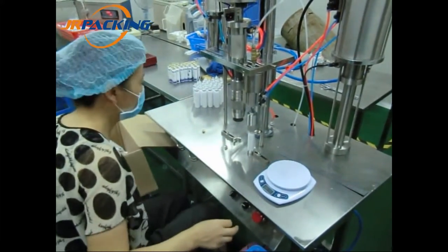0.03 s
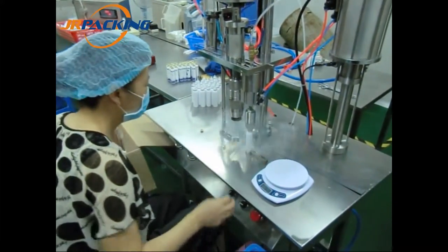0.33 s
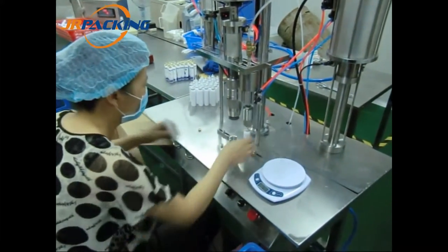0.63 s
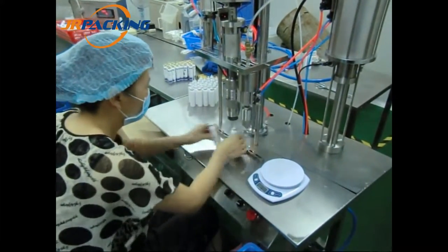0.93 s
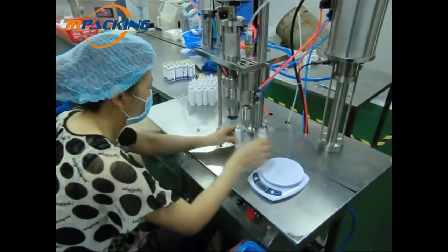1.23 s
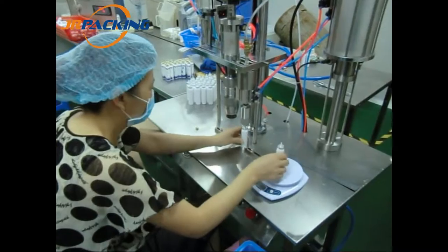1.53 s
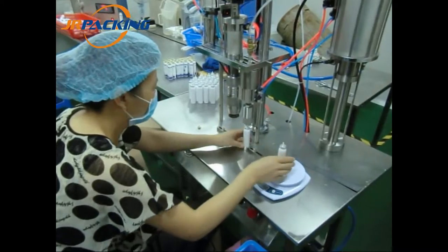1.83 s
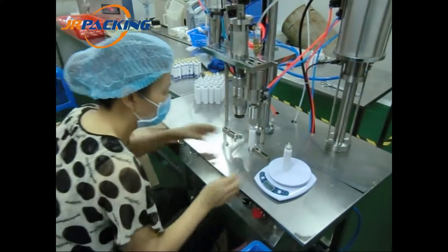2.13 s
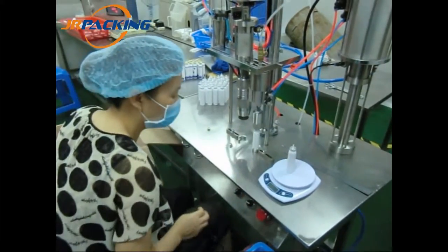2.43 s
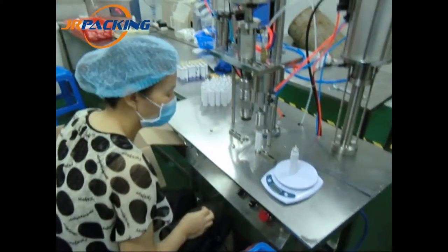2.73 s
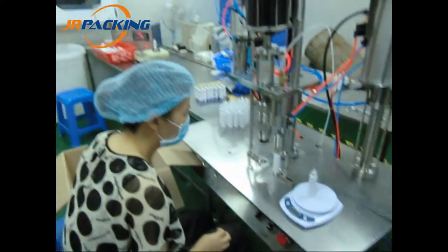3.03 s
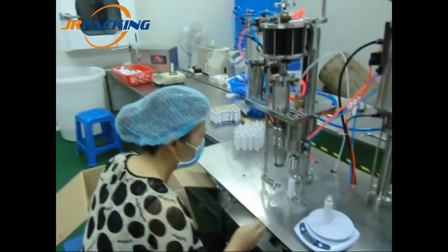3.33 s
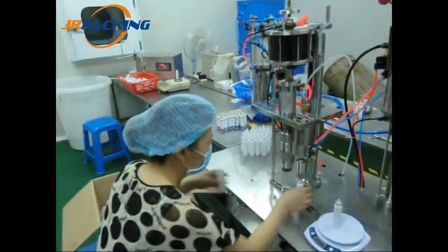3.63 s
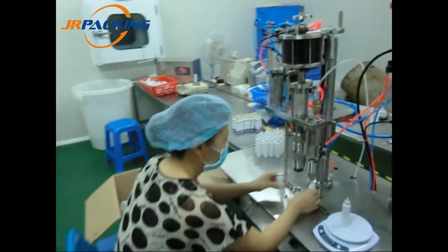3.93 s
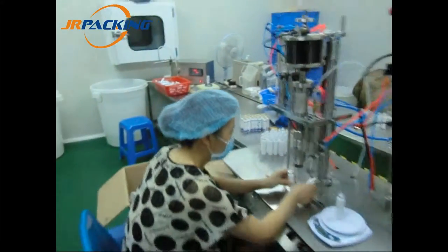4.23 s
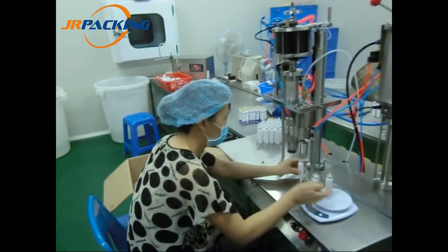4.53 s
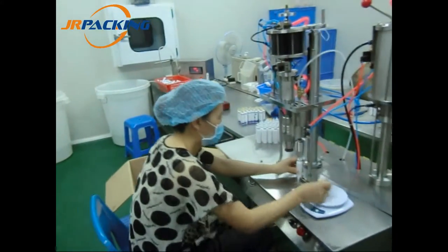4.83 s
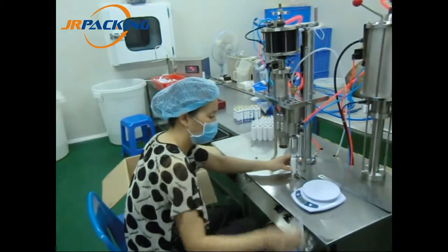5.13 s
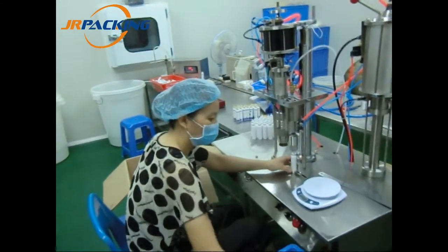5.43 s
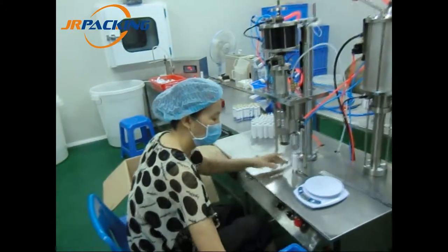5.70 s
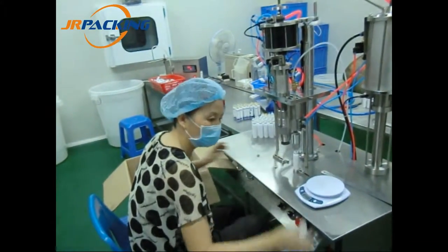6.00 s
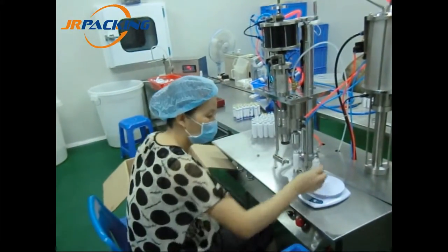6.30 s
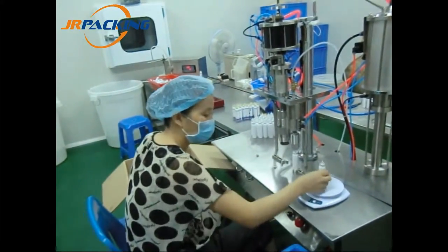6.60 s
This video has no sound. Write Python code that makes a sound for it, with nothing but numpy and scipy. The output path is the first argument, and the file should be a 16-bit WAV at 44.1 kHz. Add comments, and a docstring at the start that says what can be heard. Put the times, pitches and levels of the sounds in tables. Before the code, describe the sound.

Compressed air bursts from a filling machine in two cycles, each with pistons clunking and a steel bench droning low. After each one, small plastic bottles click on a holder and land on a scale, more softly the second time. Near the end, plastic parts knock and rustle in a cardboard box. The sounds are close in a slightly echoing workroom, where steady ventilation creeps back up after the blasts duck the recording level.

```python
"""A pneumatic bottle filler cycles twice in a hard-walled workroom, the first cycle already under way.
Its valves hiss in turn (working stroke, pilot puff, return blast) as pistons clunk on their stops,
a seal groans and the steel bench drones. After each cycle small plastic bottles click on the holder
and land on a scale; then a hand rummages in a carton of plastic parts. Ventilation is the steady bed.
The camera's gain control ducks under the loud blasts and creeps back up."""
import sys
import numpy as np
from scipy import signal
from scipy.fft import rfft, irfft, next_fast_len
from scipy.io import wavfile
from scipy.ndimage import map_coordinates

SR = 44100
rng = np.random.default_rng(int(sys.argv[2]) if len(sys.argv) > 2 else 0)


def materialize(psi):
    """Save the field psi as 16-bit PCM at rate SR to the path in sys.argv[1].

    A 1-D psi becomes a single channel; in a 2-D psi each row is a channel.
    """
    bounded = np.clip(np.atleast_2d(psi).T, -1, 1)
    quanta = np.round(bounded * 32767).astype(np.int16)
    wavfile.write(sys.argv[1], SR, quanta)


N = 293706
TIME = np.arange(N) / SR  # scene clock, s
AGE = np.arange(SR) / SR  # clock of a one-second hit, s

# machine cycle starts: t/s
CYCLE_STARTS = [-0.5274, 2.3619]
# hiss colours of the three valves: f/Hz, level/dB
STROKE_COLOUR = [(100, -20), (250, -13.5), (550, -14), (1050, -15.5), (1300, -9), (2000, -9), (2500, -0.5),
                 (3100, -1.5), (3700, -3.5), (4400, -3.5), (6500, -6), (8300, -17.5), (10300, -11)]
PUFF_COLOUR = [(100, -17), (250, -11), (480, -15), (1000, -11), (1300, -5.5), (1600, -3), (2050, -10),
               (2600, -4), (3800, -5), (5500, 1.5), (7000, 0), (10500, -8)]
RETURN_COLOUR = [(100, -25), (290, -13.5), (480, -12.5), (700, -20.5), (1080, -35), (1350, -11),
                 (2100, -9.5), (2700, -3.5), (3250, 3), (4200, -4), (4800, -2), (6200, -8), (10500, -18.5)]
# bright fizz and midrange roar of air at high pressure: f/Hz, level/dB
FIZZ_COLOUR = [(200, -37), (1000, -16), (2800, -22), (4500, -8), (6000, -9.5), (7200, -3.5), (8200, -4),
               (9400, -1.5), (10500, -6)]
ROAR_COLOUR = [(60, -21), (160, -11), (650, -6.5), (950, 4.5), (1250, 0), (1800, 6.5), (3000, -18.5)]
# exhaust silencer resonances: f/Hz, width/Hz, level/dB
SILENCER_PEAKS = [(3270, 1120, 3.5), (4390, 220, 6), (4500, 140, 3)]
# narrow tones the hiss excites in the steelwork: f/Hz, level/dB
STEEL_TONES = [(2326, -39), (2611, -37), (2783, -48), (2955, -36), (3128, -36.5), (3332, -51), (3456, -39),
               (3596, -47), (3795, -41), (4436, -45), (4807, -46)]
# hollow pop of the pilot port: f/Hz, level/dB, t60/s
PORT_MODES = [(1257, -8.5, .2), (1394, -11.5, 0.11)]

# piston hits: t/s into the cycle, thump level/dB, clank level/dB
PISTON_HITS = [(0.0, -6.5, -16), (0.121, -12.5, -9.5), (0.185, -24.5, -13), (0.497, -14.5, -20),
               (0.536, -30, -15), (0.725, -4.5, -2.5), (0.87, -19, -24)]
# ring of the steel bench, ring of the cylinder, first damped jolt of a hit: f/Hz, level/dB, t60/s
BENCH_MODES = [(82, -16, 0.047), (141.5, 4.5, 0.13), (187, 4, 0.11), (200.5, 1, 0.2), (249, -4.5, 0.1),
               (310, -28, 0.054)]
CYLINDER_MODES = [(595, -11.5, 0.23), (790, -4.5, 0.066), (955, 4.5, 0.026), (1160, -13, 0.034),
                  (1490, -6, 0.027), (1740, -4, 0.15), (2850, -10, 0.044), (5030, 5, 0.035)]
JOLT_MODES = [(221, -0.37, 0.034), (897, -1.6, 0.012)]
# low shudder of the bench: f/Hz, level/dB
SHUDDER_COLOUR = [(25, -23), (75, -10), (150, -1.5), (260, -4), (450, -13.5), (1200, -12.5),
                  (3000, -50.5)]
# piston seal groans: t/s into the cycle, level/dB, half-length/s
SEAL_GROANS = [(0.5, -27.5, 0.03), (0.896, -30, 0.046), (1.004, -30.5, 0.031)]
# resonances of the rubbing seal and the droning bench: f/Hz, width/Hz, level/dB
SEAL_PEAKS = [(484, 52, 19), (224, 160, -2)]
DRONE_PEAKS = [(141, 11, 2), (170, 14, -6), (116, 12, -10)]

# bottles clicking on the holder: t/s, level/dB, snap trim/dB
BOTTLE_CLICKS = [(1.318, -20.5, 1), (1.536, -33.5, -8), (4.3842, -25.5, -5), (4.442, -34.5, -16),
                 (4.505, -35.5, -1.5), (4.637, -36, -16), (4.662, -34.5, -2)]
# bottles landing on the scale: t/s, level/dB
BOTTLE_SETDOWNS = [(1.6066, -10), (4.7611, -32), (4.772, -35)]
# body of a click, its bright snap, clack of the scale pan: f/Hz, level/dB
CLICK_COLOUR = [(200, -31), (380, -7.5), (680, 2), (850, 1), (1050, 1.5), (1200, -4), (1400, 4),
                (1950, -10), (3000, -10), (5000, -12), (10500, -25)]
SNAP_COLOUR = [(400, -16), (1300, -4), (2000, -5), (2400, 2), (3300, 0.5), (4500, -9), (10000, -10)]
PAN_COLOUR = [(250, -42), (430, -2), (560, 3.5), (690, -4.5), (850, -3), (1020, -14), (1250, 1), (1550, -3),
              (1900, 0), (2600, -3), (3100, -16), (4000, -22), (4800, -9.5), (5700, -31), (8200, -20),
              (10000, -33)]
# ring of the scale pan: f/Hz, level/dB, t60/s
PAN_MODES = [(483, -18, .08), (857, -2.5, 0.093), (1215, 6.5, 0.083), (1820, -13, .04), (2530, -11, .04),
             (4530, 3, 0.026), (8000, -16, .02)]

# parts knocking in the carton: t/s, level/dB, carton trim/dB, low ring trim/dB, high ring trim/dB
PART_KNOCKS = [(5.693, -26.5, -5, -19, -20), (5.744, -29, -12, -11, -13), (5.79, -32, -1, -17, -10),
               (5.884, -18, -8.5, -27, -18), (5.959, -19, -12, -8, -17), (5.967, -14.5, -15.5, -10, -16),
               (5.989, -19.5, -2, -3, -16), (6.063, -22.5, -25, -2, -10), (6.115, -17.5, -25, -2, -12),
               (6.196, -13, -17, -11.5, -7), (6.354, -21.5, -6.5, -21, -22), (6.375, -19.5, -20, -9, -22)]
# parts sliding over each other: t/s, level/dB, hold/s
PART_SLIDES = [(5.871, -34, .1), (6.159, -35, 0.026), (6.345, -39.5, 0.036), (6.483, -29.5, 0.041)]
# crack of a knock and rustle of a slide: f/Hz, level/dB
CRACK_COLOUR = [(150, -28), (420, 1), (700, -3.5), (900, 0), (1300, -6), (1900, 0), (2550, -12.5),
                (3200, -7.5), (4400, -7), (6500, -9), (10500, -14.5)]
RUSTLE_COLOUR = [(70, -14), (150, 10), (260, -1.5), (500, 3), (1000, 0.5), (1500, -8), (1950, -1.5),
                 (2600, -4.5), (4000, -10), (8000, -9), (10500, -15)]
# boxy carton, low and high ring of the parts: f/Hz, level/dB, t60/s
CARTON_MODES = [(181, -5, 0.076), (269, 0, 0.074), (321, -1, 0.068), (510, -14, 0.029), (925, -4, 0.021)]
PART_LOW_MODES = [(1845, -9.5, 0.072), (1937, 5, 0.047)]
PART_HIGH_MODES = [(2860, -4.5, 0.044), (3167, 3, 0.05), (4410, -13, 0.072)]

# ventilation rush: f/Hz, level/dB
VENT_COLOUR = [(10, -23), (22, 0), (70, -1.5), (100, -5), (135, -0.5), (200, -2.5), (330, 0), (430, -3),
               (650, -5), (1450, -6), (2000, -11), (3300, -11), (4200, -17), (10500, -23)]
# duct resonances: f/Hz, width/Hz, level/dB
DUCT_PEAKS = [(193, 18, 5.5), (575, 4.9, 1.5), (1370, 96, -4.5), (2440, 66, -9)]
# workroom reverb time: f/Hz, t60/s
ROOM_DECAY = [(150, 1), (500, 0.73), (1400, 0.83), (3500, 1), (10000, 0.64)]
# EQ of the bench scatter in the stereo side channel: f/Hz, level/dB
SIDE_EQ = [(40, -21), (85, -16), (170, -29), (330, -17.5), (650, -19.5), (1400, -20), (2800, -32),
           (5500, -22), (10000, -17.5)]

STROKE_AT_S, PUFF_AT_S, RETURN_AT_S = 0.0016, 0.539, 0.727  # valves open this far into a cycle
# layer envelopes: rise, sag while held, then die away
STROKE_HISS = dict(db=-7.5, rise_s=0.0027, hold_s=0.87, sag_db_per_s=13, fall_db_per_s=65)
STROKE_FIZZ = dict(db=-9.5, rise_s=0.0015, hold_s=0.066, sag_db_per_s=12, fall_db_per_s=86)
PUFF_HISS = dict(db=-8, rise_s=0.0063, hold_s=0.069, sag_db_per_s=2, fall_db_per_s=56)
PUFF_FIZZ = dict(db=-7, rise_s=0.046, hold_s=0.05, sag_db_per_s=6, fall_db_per_s=121.5)
PUFF_HOWL = dict(db=-12, rise_s=0.0018, hold_s=0.028, sag_db_per_s=280, fall_db_per_s=101)
RETURN_HISS = dict(db=-3.5, rise_s=0.0012, hold_s=0.13, sag_db_per_s=6, fall_db_per_s=62)
RETURN_FIZZ = dict(db=-4, rise_s=0.0012, hold_s=0.14, sag_db_per_s=28, fall_db_per_s=94)
BENCH_SHAKE = dict(db=-15, rise_s=0.006, hold_s=0.085, sag_db_per_s=242, fall_db_per_s=14)
TOP_HZ = 10560  # band limit


def working_stroke():
    """A leak at the seal swells until the valve opens; the cylinder vents, dulling as pressure drops."""
    leak_db, swell_db_per_s = -23.5, 483
    waits = [start + STROKE_AT_S - TIME for start in CYCLE_STARTS]
    leak = sum(amp(leak_db - swell_db_per_s * np.abs(wait)) * (wait > 0) for wait in waits)
    air = air_jet(STROKE_AT_S, STROKE_HISS, STROKE_FIZZ, STROKE_COLOUR, roar_db=-2.5, silencer_db=-10.5)
    return leak * noise(PUFF_COLOUR) + air


def pilot_puff():
    """A bright puff pops the hollow of the pilot port and makes it howl."""
    out = air_jet(PUFF_AT_S, PUFF_HISS, PUFF_FIZZ, PUFF_COLOUR, roar_db=-21, silencer_db=-12)
    out += valve_flow(PUFF_AT_S, PUFF_HOWL) * resonant_noise([(1274, 57, 0)])
    for start in CYCLE_STARTS:
        add(out, start + PUFF_AT_S, amp(-10) * ring(PORT_MODES))
    return out


def return_blast():
    """The loudest blast of air, dumped through the silencer."""
    return air_jet(RETURN_AT_S, RETURN_HISS, RETURN_FIZZ, RETURN_COLOUR, roar_db=-6, silencer_db=-8)


def air_jet(at_s, hiss_shape, fizz_shape, colour, roar_db, silencer_db):
    """Turbulent air: hiss coloured by silencer and steelwork, fizz and roar while pressure is high."""
    hiss_flow, fizz_flow = valve_flow(at_s, hiss_shape), valve_flow(at_s, fizz_shape)
    steel = amp(-12) * resonant_noise([(hz, 10, db) for hz, db in STEEL_TONES])
    hiss = noise(colour) + amp(silencer_db) * resonant_noise(SILENCER_PEAKS) + steel
    roar = amp(roar_db) * fizz_flow ** 1.89 * noise(ROAR_COLOUR)  # dies faster than the fizz
    air = hiss_flow * hiss + fizz_flow * noise(FIZZ_COLOUR) + roar
    return steel_reflections(air, echo_db=-8) * amp(0.16 * wobble(120))


def valve_flow(at_s, shape):
    """Air flow through a valve that opens at the same point of every cycle."""
    return sum(envelope(start + at_s, **shape) for start in CYCLE_STARTS)


def piston_clunks():
    """Pistons hit their stops: the cylinder clanks, the bench jolts, rings and shudders."""
    out = np.zeros(N)
    for start in CYCLE_STARTS:
        for s, thump_db, clank_db in PISTON_HITS:
            jolt = amp(-1) * ring(JOLT_MODES)
            shudder = amp(-8.5) * knock(SHUDDER_COLOUR, t60=0.18, rise_s=0.0028, wet_db=2)
            bench = amp(-2.5) * ring(BENCH_MODES, detune=0.017)
            clank = in_room(ring(CYLINDER_MODES, detune=0.0034), wet_db=-10)
            add(out, start + s, amp(thump_db) * (jolt + bench + shudder) + amp(clank_db) * clank)
    return out


def seal_groans():
    """The piston seal slides in its bore with short, low groans."""
    rub = sum(amp(db) * np.exp(-((TIME - start - s) / half_length) ** 2)
              for start in CYCLE_STARTS for s, db, half_length in SEAL_GROANS)
    return rub * resonant_noise(SEAL_PEAKS)


def bottles():
    """Bottles click crisply on the holder and knock hollowly on the pan of the scale."""
    out = np.zeros(N)
    for s, db, snap_db in BOTTLE_CLICKS:
        body = knock(CLICK_COLOUR, t60=0.031, rise_s=0.00025, wet_db=8.5)
        snap = amp(6) * knock(SNAP_COLOUR, t60=0.012, rise_s=0.0001, wet_db=4.5)
        add(out, s, amp(db) * (body + amp(snap_db) * snap))
    for s, db in BOTTLE_SETDOWNS:
        clack = amp(-2) * knock(PAN_COLOUR, t60=0.039, rise_s=0.0001, wet_db=5)
        pan = amp(-0.5) * in_room(ring(PAN_MODES), wet_db=-15)
        add(out, s, amp(db) * (clack + pan))
    return out


def knocking_parts():
    """Plastic parts crack together and drum on the carton, each rebounding twice."""
    rebound_s, rebound_loss_db = 0.009, 7
    out = np.zeros(N)
    for s, db, carton_db, low_db, high_db in PART_KNOCKS:
        crack = knock(CRACK_COLOUR, t60=0.031, rise_s=0.0011, wet_db=-1.5)
        part = amp(low_db) * ring(PART_LOW_MODES, detune=0.018)
        part += amp(high_db) * ring(PART_HIGH_MODES, detune=0.013)
        carton = amp(carton_db + 5) * ring(CARTON_MODES, detune=0.09)
        contact = crack + in_room(part, wet_db=-2.5) + in_room(carton, wet_db=-3)
        for bounce, jitter in enumerate(rng.uniform(0.75, 1.25, size=3)):
            add(out, s + bounce * rebound_s * jitter, amp(db - bounce * rebound_loss_db) * contact)
    return out


def sliding_parts():
    """Parts rub over each other in soft swells of rustle."""
    power = sum(envelope(s, db, rise_s=0.013, hold_s=hold, sag_db_per_s=10, fall_db_per_s=44) ** 2
                for s, db, hold in PART_SLIDES)
    return np.sqrt(power) * amp(0.53 * wobble(150)) * noise(RUSTLE_COLOUR)


def bench_drone():
    """The travelling piston shakes the bench, hardest as it sets off, until the return blast."""
    release_s = 0.06
    shake = np.zeros(N)
    for start in CYCLE_STARTS:
        since_return = np.maximum(TIME - start - RETURN_AT_S, 0)
        shake += envelope(start + STROKE_AT_S, **BENCH_SHAKE) * np.exp(-since_return / release_s)
    return shake * resonant_noise(DRONE_PEAKS)


def ventilation():
    """A steady bed of rushing air with a few soft duct resonances."""
    level_db = -40 + 0.45 * wobble(2.6)
    return amp(level_db) * (noise(VENT_COLOUR) + amp(-9.5) * resonant_noise(DUCT_PEAKS))


def steel_reflections(x, echo_db):
    """Close reflections off the bench and columns ripple the spectrum."""
    echoes = rng.standard_normal(SR) * decay(0.14) * (AGE > 0.002)
    reflected = signal.fftconvolve(x, echoes / np.linalg.norm(echoes))[:N]
    return (x + amp(echo_db) * reflected) / np.sqrt(1 + amp(echo_db) ** 2)


def in_room(x, wet_db):
    """A one-second hit plus its own reverb tail from the walls."""
    return x + amp(wet_db) * signal.fftconvolve(x, room_tail(rng.standard_normal(SR)))[:SR]


def room_tail(hiss):
    """Shape a second of noise into the diffuse tail off the hard walls, of energy 1."""
    hz, t, spectrum = signal.stft(hiss, SR, nperseg=256)
    fade = np.exp(-np.log(1000) * t / curve_at(ROOM_DECAY, hz)[:, None])
    tail = signal.istft(spectrum * fade, SR, nperseg=256)[1][:SR]
    early_lift = 1 + 0.74 * decay(0.36)  # the bench and near wall answer first
    tail = tail * np.clip(AGE / 0.01, 0, 1) * early_lift
    return tail / np.linalg.norm(tail)


def knock(colour, t60, rise_s, wet_db):
    """A contact excites countless damped modes: a noise burst with its room tail."""
    direct = decay(t60) * (1 - np.exp(-AGE / rise_s)) * noise(colour, size=SR)
    return direct + amp(wet_db) * np.linalg.norm(direct) * room_tail(noise(colour, size=SR))


def ring(modes, detune=0.0):
    """Damped modes; each strike varies their strengths, and their pitches by the fraction detune."""
    out = np.zeros(SR)
    for k, (hz, db, t60) in enumerate(modes):
        strength = (-1) ** k * amp(db + rng.normal())
        pitch_hz = hz * (1 + detune * rng.normal())
        out += strength * decay(t60) * np.sin(2 * np.pi * pitch_hz * AGE)
    return out / np.sqrt(sum(amp(db) ** 2 for _, db, _ in modes) / 2)


def noise(colour, size=N):
    """Band-limited noise of rms 1 with a colour of f/Hz, level/dB points."""
    white = rng.standard_normal(size)
    return unit_rms(filtered(white, lambda hz: amp(curve_at(colour, hz)) * (hz < TOP_HZ)))


def resonant_noise(peaks):
    """Noise of rms 1 ringing in peaks of f/Hz, width/Hz, level/dB."""
    def response(f):
        return np.sqrt(sum(amp(db) ** 2 / (1 + ((f - hz) / width) ** 2) ** 2 for hz, width, db in peaks))
    return unit_rms(filtered(rng.standard_normal(N), response))


def envelope(start_s, db, rise_s, hold_s, sag_db_per_s, fall_db_per_s):
    """A linear attack, a sag while held, then the release."""
    age = np.maximum(TIME - start_s, 0)
    loss_db = sag_db_per_s * np.minimum(age, hold_s) + fall_db_per_s * np.maximum(age - hold_s, 0)
    return np.minimum(age / rise_s, 1) * amp(db - loss_db)


def decay(t60):
    """A fall of 60 dB in t60 seconds."""
    return np.exp(-np.log(1000) * AGE / t60)


def wobble(rate):
    """Smooth random modulation, rate knots a second."""
    return map_coordinates(rng.standard_normal(int(N * rate / SR) + 4), [TIME * rate])


def filtered(x, response):
    """Zero-phase EQ; response gives the gain at each frequency."""
    size = next_fast_len(len(x) + SR // 4)
    return irfft(rfft(x, size) * response(np.fft.rfftfreq(size, 1 / SR)), size)[:len(x)]


def curve_at(points, hz):
    """Read f/Hz, value points on a log frequency axis."""
    freqs, values = np.transpose(points)
    return np.interp(np.log(hz + 1), np.log(freqs + 1), values)


def amp(db):
    """Decibels to gain."""
    return 10 ** (np.asarray(db) / 20)


def unit_rms(x):
    """Scale to rms 1."""
    return x / np.sqrt(np.mean(x ** 2) + 1e-20)


def add(track, s, x):
    """Mix x into the track at s seconds, dropping what falls outside."""
    start = round(s * SR)
    x = x[max(-start, 0):]
    part = track[max(start, 0):][:len(x)]
    part += x[:len(part)]


def gain_control(x):
    """The gain ducks fast under loud sound and creeps back at a steady rate."""
    threshold_db, duck_per_db, attack_s, recovery_db_per_s = -18.5, 0.73, 0.0088, 3.5
    opening_duck_db = 8.5  # from the stroke already under way
    pole = np.exp(-1 / (attack_s * SR))
    power = signal.lfilter([1 - pole], [1, -pole], np.mean(x ** 2, axis=0))
    needed_db = duck_per_db * np.maximum(10 * np.log10(power + 1e-20) - threshold_db, 0)
    recovered_db = recovery_db_per_s * TIME
    duck_db = np.maximum.accumulate(np.maximum(needed_db + recovered_db, opening_duck_db)) - recovered_db
    return x * amp(-duck_db)


def scene():
    """A near-mono mix; scatter off the bench widens the close sounds a little, the piston blows most."""
    air = working_stroke() + pilot_puff() + return_blast()
    blows = seal_groans() + piston_clunks()
    handling = bottles() + knocking_parts() + sliding_parts()
    width_send = air + amp(6.5) * blows + amp(-5.5) * handling
    scatter = rng.standard_normal(SR) * decay(0.039)
    side = signal.fftconvolve(width_send, scatter / np.linalg.norm(scatter))[:N]
    side = filtered(side, lambda hz: amp(curve_at(SIDE_EQ, hz)))
    mid = air + blows + handling + ventilation() + bench_drone()
    return np.array([mid + side, mid - side])


def record(dry):
    """The camera rides its gain, soft-clips the highest peaks and cuts the top end steeply."""
    ceiling, edge_hz = 0.9, 120
    ridden = gain_control(dry)
    rounded = ridden / (1 + np.abs(ridden / ceiling) ** 6) ** (1 / 6)
    return np.array([filtered(channel, lambda hz: np.clip((TOP_HZ - hz) / edge_hz + 0.5, 0, 1))
                     for channel in rounded])


dry = scene()
out = record(dry)
materialize(out)
```